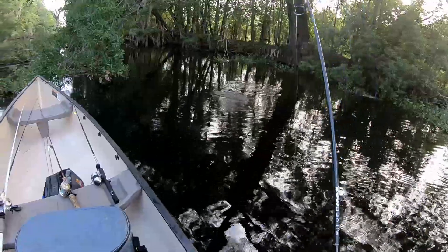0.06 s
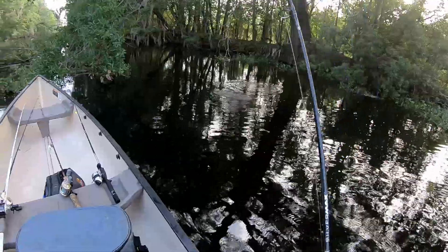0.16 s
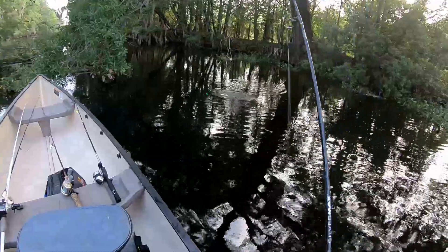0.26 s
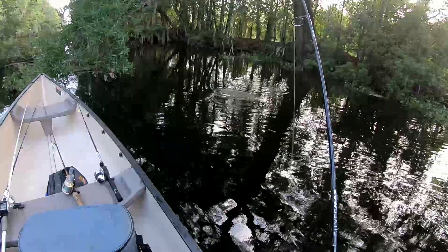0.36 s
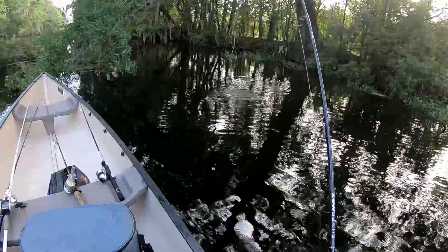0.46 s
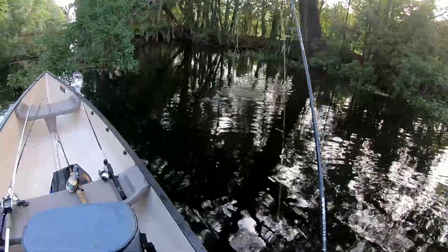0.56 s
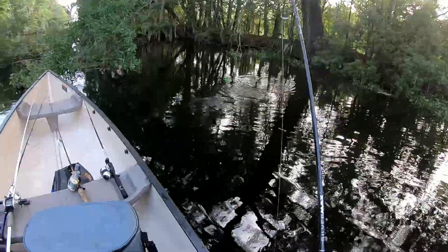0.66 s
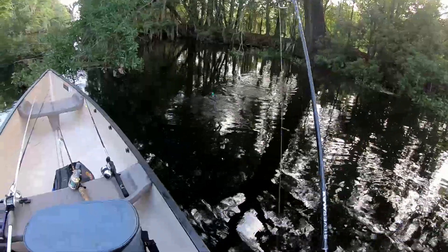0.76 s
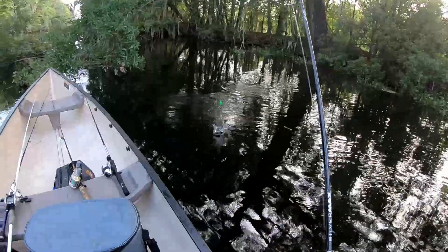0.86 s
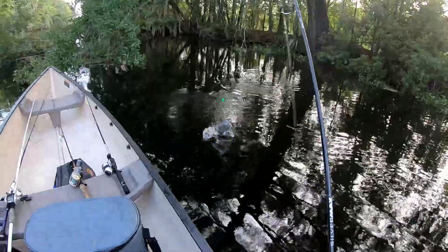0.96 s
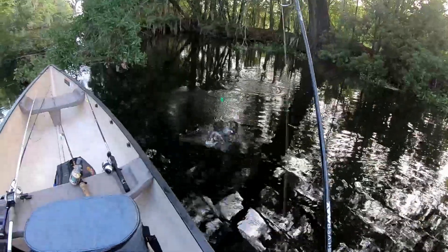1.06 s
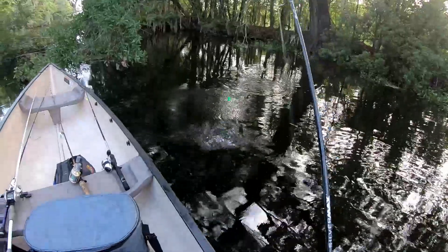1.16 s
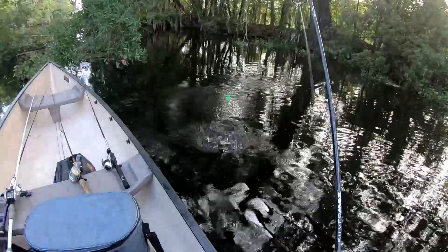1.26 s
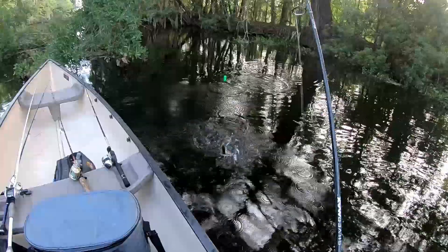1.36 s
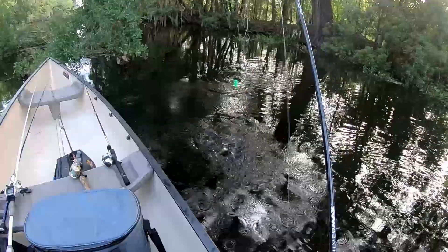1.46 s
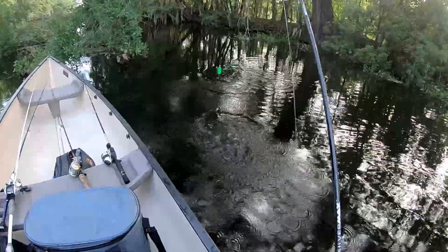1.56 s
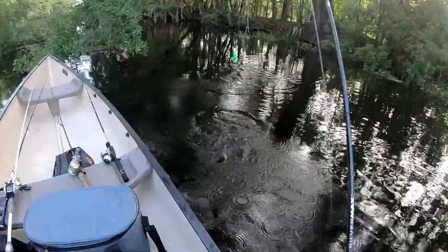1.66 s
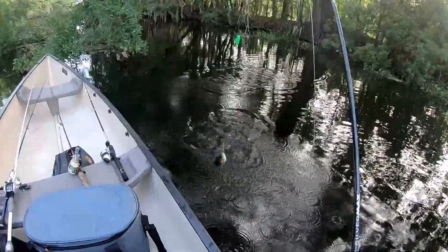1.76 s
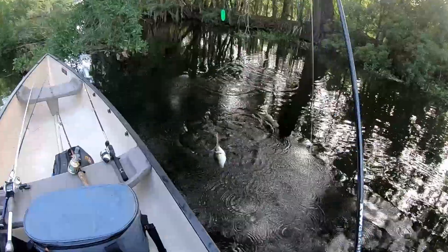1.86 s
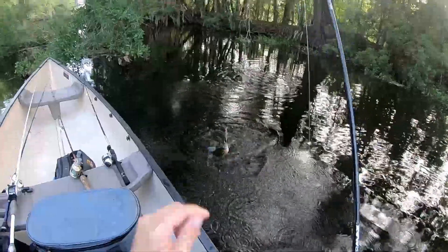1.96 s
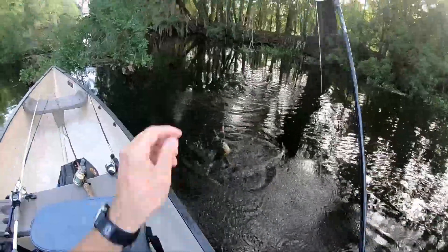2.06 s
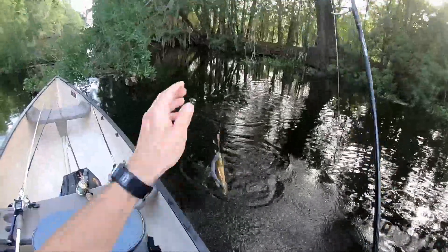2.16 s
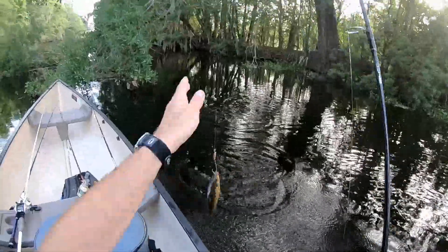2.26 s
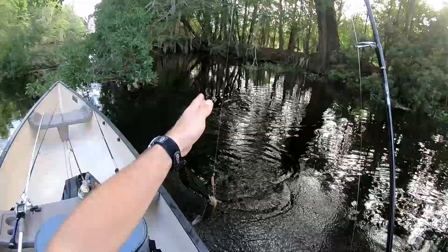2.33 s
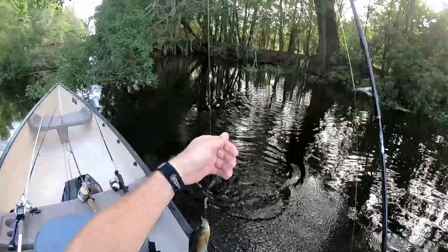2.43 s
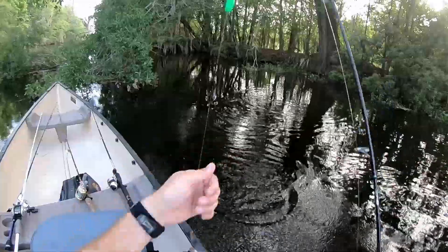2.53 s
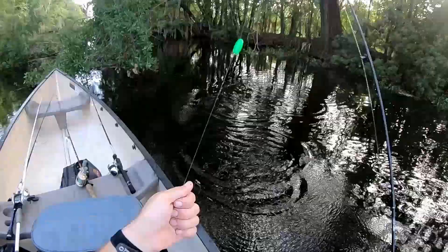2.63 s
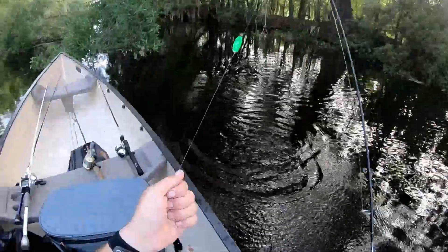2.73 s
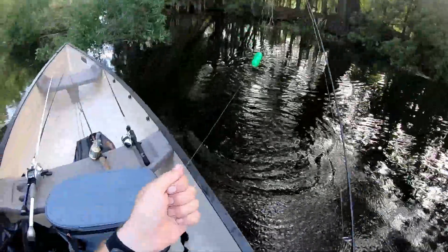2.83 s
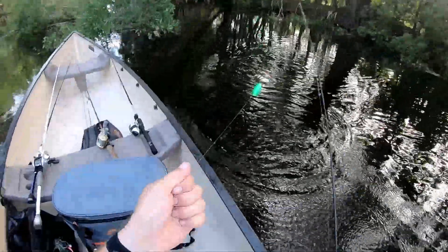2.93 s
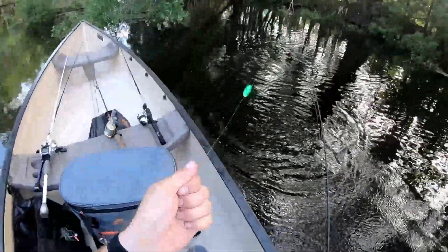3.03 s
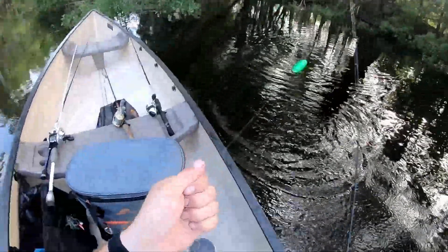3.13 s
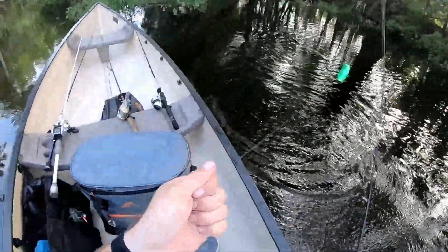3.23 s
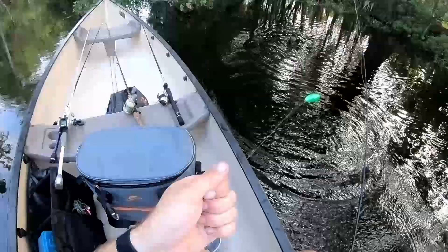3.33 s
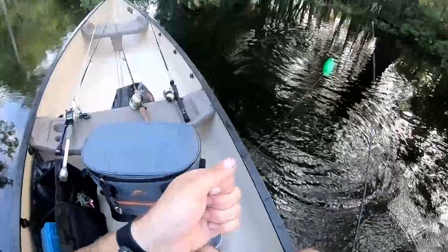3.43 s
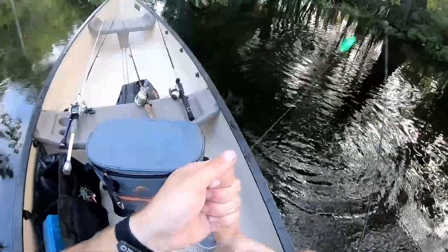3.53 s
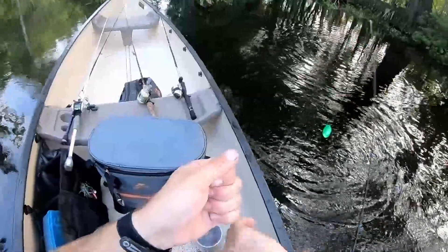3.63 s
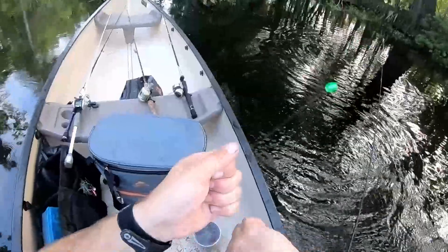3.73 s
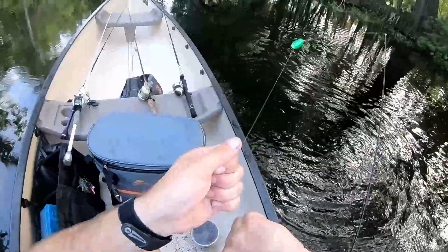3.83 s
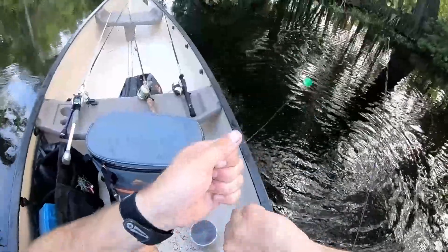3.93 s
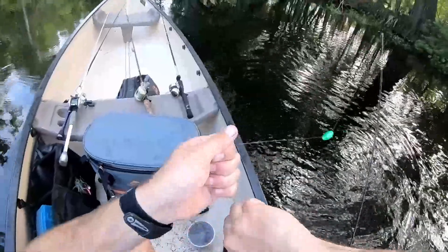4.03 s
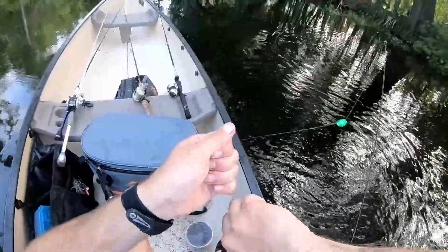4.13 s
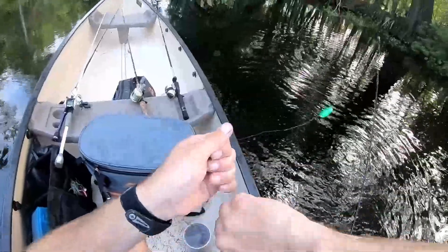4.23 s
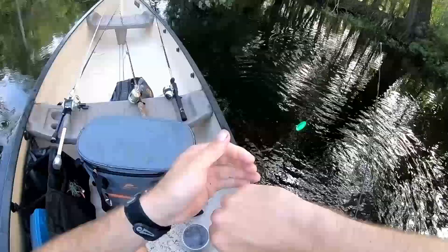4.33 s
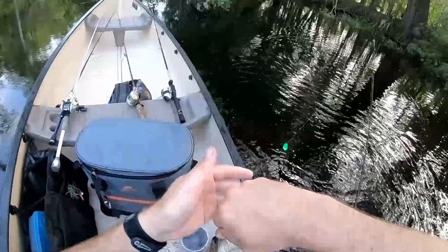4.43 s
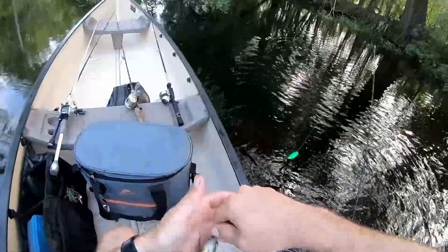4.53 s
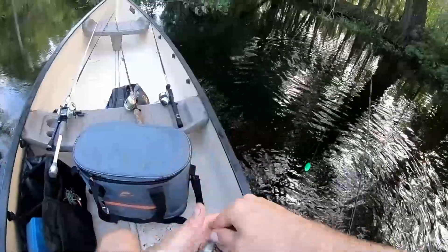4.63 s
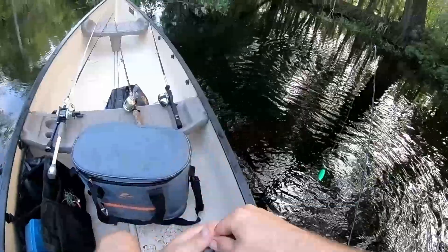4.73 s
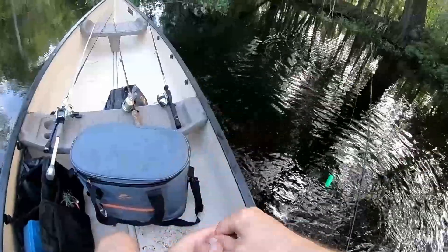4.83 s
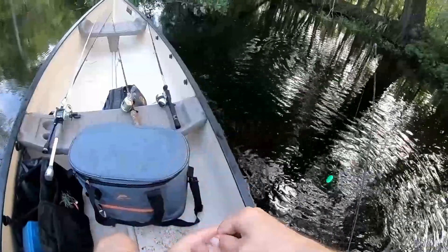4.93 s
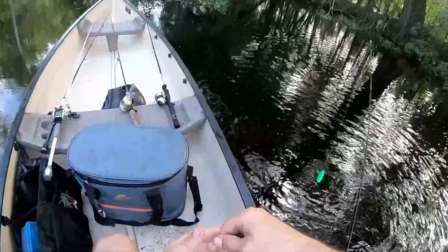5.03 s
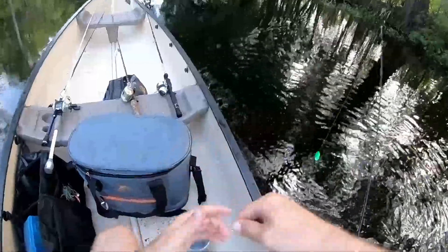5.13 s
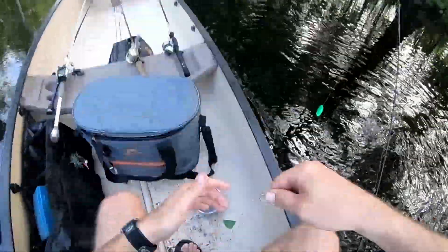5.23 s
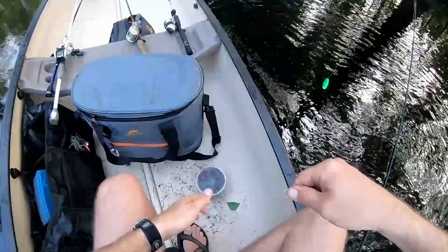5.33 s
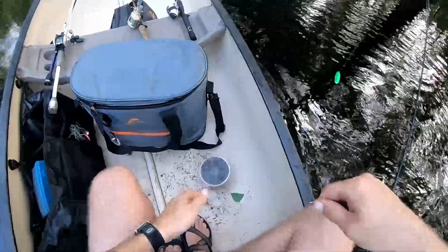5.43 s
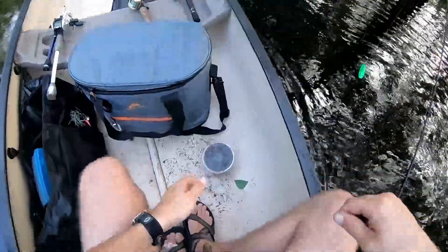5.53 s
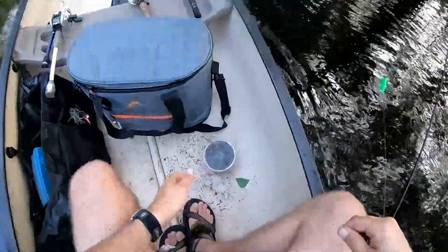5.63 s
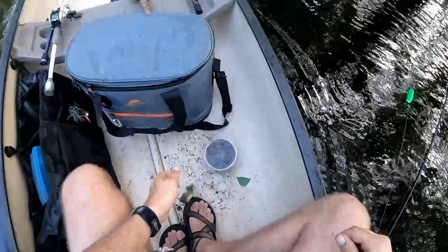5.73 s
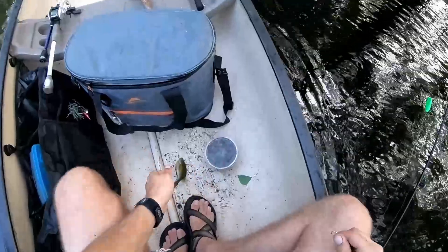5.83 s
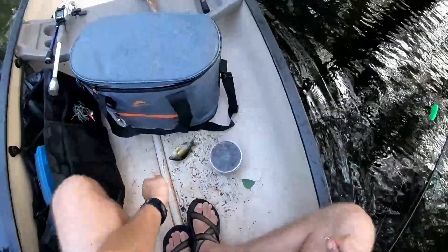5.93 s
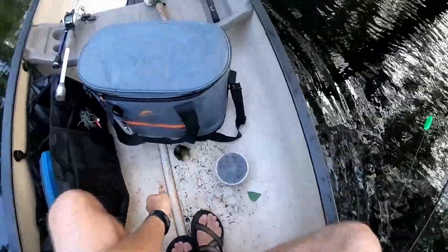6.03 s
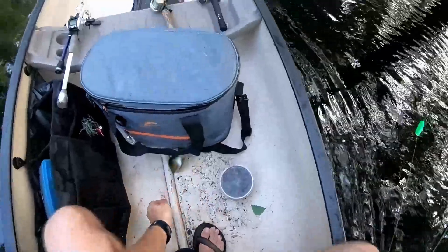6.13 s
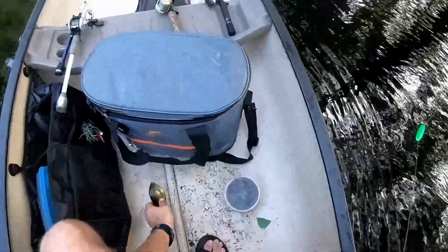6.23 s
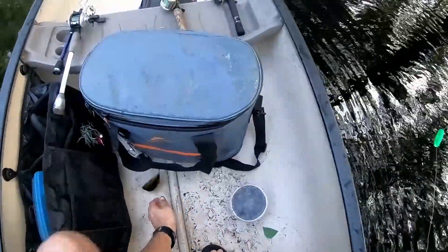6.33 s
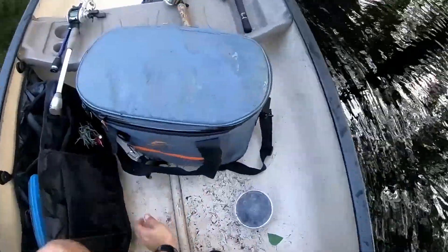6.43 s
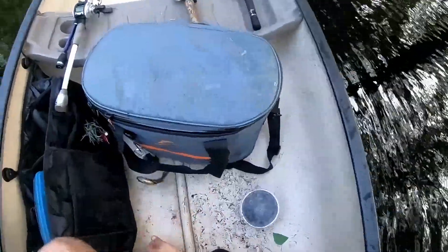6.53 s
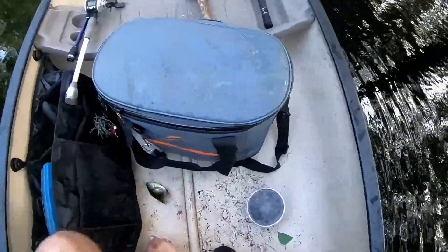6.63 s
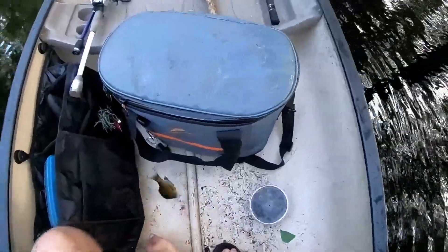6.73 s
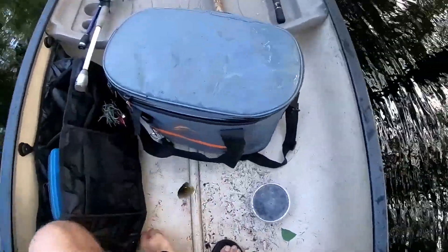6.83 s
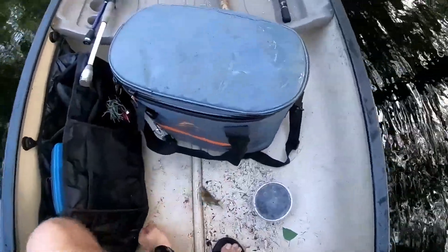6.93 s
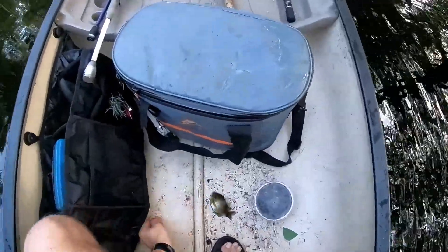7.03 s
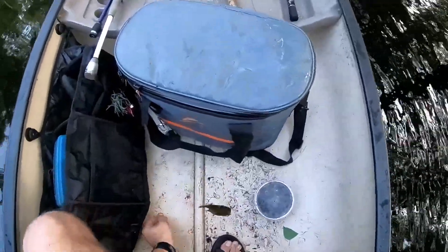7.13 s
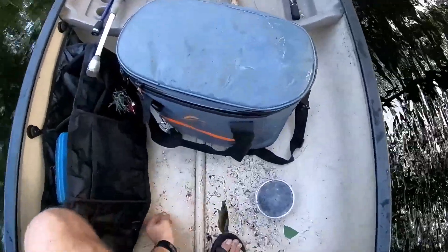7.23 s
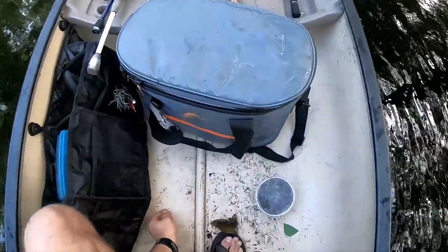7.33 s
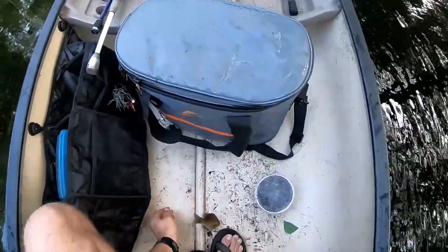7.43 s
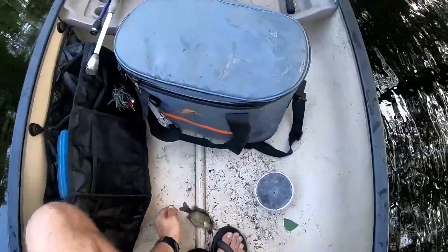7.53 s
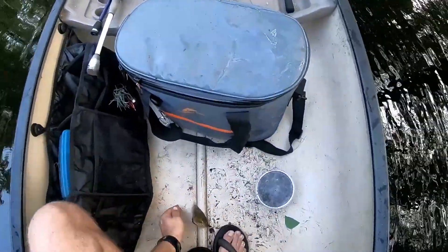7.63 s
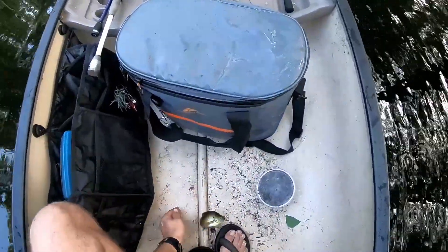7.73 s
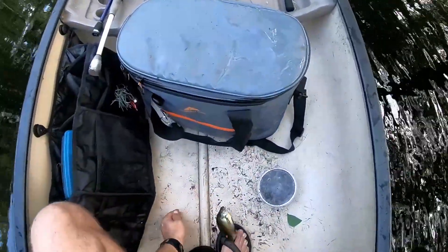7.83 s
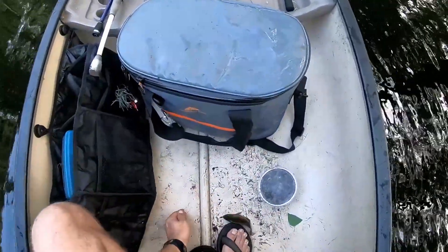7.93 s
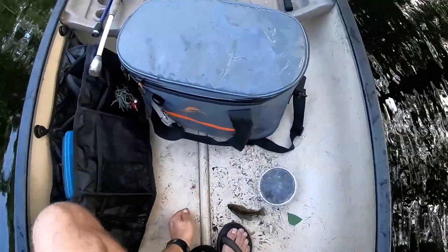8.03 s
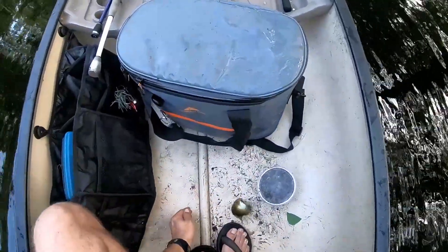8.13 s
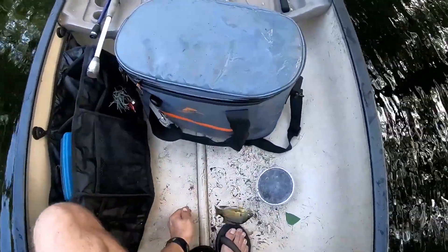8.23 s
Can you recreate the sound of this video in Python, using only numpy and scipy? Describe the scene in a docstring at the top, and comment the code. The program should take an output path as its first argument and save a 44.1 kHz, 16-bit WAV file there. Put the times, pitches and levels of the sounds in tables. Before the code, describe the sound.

A quiet open swamp: soft wide air, a thin steady insect chorus, and a high throbbing cicada on the right that swells until about 2.3 s, drops suddenly and continues very faintly. Two tiny high flicks come near 0.1-0.2 s, a single bubble or two near 0.6 and 0.9 s, then a short splash of plopping bubbles and fine spray from 1.0 to 1.5 s. A barely audible falling bird whistle passes around 2.3 s, with a deep body bump at 2.45 s. From 3.1 to 3.7 s a rod clatters on the hull, hollow and rattling, with scraping friction; lighter taps follow to 4.1 s. Sparse ticks lead to a knock and heavy low jolt at 5.3 s. From 5.7 s the fish flops, sharp gritty ticks and dull thuds, hardest around 6.3-6.8 s with strong rumble, then scattered softer flops until 8.25 s. Close, worn microphones.

```python
"""Fish landed in a still swamp

On a small boat, a chest camera with two microphone ports hears a hooked fish splash (bubble tones), a rod laid
down and rattling on the hull (ringing modes under ticks), then the fish flopping on the gritty floor (ticks and
thuds). The wearer's moves rumble close up (low swings and noise). Far off, shaped noise makes air, insects and
a cicada on the right; a gliding sine is one bird whistle."""
import sys
import numpy as np
from scipy.fft import rfft, irfft, next_fast_len
from scipy.io import wavfile
from scipy.ndimage import uniform_filter1d, map_coordinates

SR = 44100
rng = np.random.default_rng(int(sys.argv[2]) if len(sys.argv) > 2 else 0)


def generate_wav(sig):
    """Save sig (samples, or channels by samples) to the path in sys.argv[1] as 16-bit PCM at SR."""
    pcm = np.round(np.clip(np.atleast_2d(sig).T, -1, 1) * 32767).astype(np.int16)
    wavfile.write(sys.argv[1], SR, pcm)


N = 364707

# Far air over the swamp, part shared by both ports: (frequency [Hz], relative density [dB])
AIR_SHARED = [(140, -38), (230, -3), (450, -12.5), (520, -15), (900, -15), (1400, -18), (1800, -23.5),
              (3000, -25), (4600, -31), (6100, -21), (7500, -26.5), (11300, -27), (13500, -30),
              (15800, -61)]
# Far air, part opposed between the ports: (frequency [Hz], relative density [dB])
AIR_OPPOSED = [(140, -51), (230, 5.5), (501, -5.5), (689, -2), (753, -1.5), (1300, -8.5), (1470, -11.5),
               (2380, -19), (4260, -76), (5970, -32), (7250, -23.5), (12100, -25.5), (15800, -68)]
AIR_SHARED_DB, AIR_OPPOSED_DB = -66, -59.5  # rms

# Far insect chorus: (frequency [Hz], relative density [dB])
CHORUS_SPECTRUM = [(5400, -13.5), (5750, 4), (6000, 6.5), (6250, 6.5), (6600, -17.5)]
# Cicada buzz colour: (frequency [Hz], relative density [dB])
CICADA_SPECTRUM = [(3820, -34), (6500, -8), (6810, -5.5), (7300, -4), (8600, -5.5), (9320, -1),
                   (10800, -0.5), (12600, -5.5), (15500, -21)]
# Cicada loudness: (time [s], level [dB])
CICADA_LEVEL = [(0.0, -66.5), (0.5, -64.5), (0.99, -63.5), (1.38, -61), (2.14, -60.5), (2.3, -62.5),
                (2.42, -79), (2.69, -77.5), (3.48, -69.5), (4.35, -73.5), (6.49, -71), (8.27, -72.5)]
# Far bird whistle: (time [s], level [dB], pitch [Hz])
BIRD_WHISTLE = [(2.2, -105, 4453), (2.25, -84, 4312), (2.44, -82, 4267), (2.469, -105, 4276)]

# Upper hull murmur: (frequency [Hz], relative density [dB])
MURMUR_SPECTRUM = [(70, -64), (110, -10), (155, -0.5), (215, -6.5), (270, -19), (340, -22.5), (500, -59),
                   (900, -120)]
# Lower hull slosh: (frequency [Hz], relative density [dB])
SLOSH_SPECTRUM = [(35, -63), (58, -2), (85, -6.5), (110, -5), (160, -50), (300, -120)]
# Low bumps through the hull: (centre time [s], length [s], murmur level [dB], slosh level [dB])
HULL_BUMPS = [(0.09, 0.095, -54.5, -45.5), (0.67, 0.087, -64, -50), (1.02, 0.049, -41, -42.5),
              (1.5, 0.089, -80, -55), (1.68, .08, -49.5, -44.5), (2.165, 0.035, -60, -43),
              (2.39, 0.096, -52.5, -52), (2.51, 0.063, -69, -47), (2.65, 0.07, -60, -59),
              (3.14, 0.049, -51, -55), (3.3, 0.042, -35, -29.5), (3.45, 0.087, -34.5, -46),
              (3.61, 0.073, -49.5, -43), (3.82, 0.035, -80, -54), (4.6, 0.09, -64, -54),
              (5.33, 0.068, -38, -36.5), (5.44, 0.072, -54.5, -43.5), (5.94, 0.11, -50, -62),
              (6.1, 0.11, -52, -44.5), (6.51, 0.16, -46, -45), (6.82, .12, -40, -43.5),
              (7.1, 0.082, -55, -45.5), (7.52, .1, -49, -74), (7.66, 0.083, -57, -59),
              (8.06, .12, -49, -49)]
MURMUR_DB, SLOSH_DB = -56, -61.5  # the hull at rest

# Rumble of the worn camera: (frequency [Hz], relative density [dB])
RUMBLE_SPECTRUM = [(10, -30), (20, -4), (30, 0), (42, -3), (55, -14), (75, -30), (120, -70), (250, -140)]
# Steady fidgeting of the wearer: (time [s], level [dB])
SWAY_LEVEL = [(0.0, -44), (1.6, -52), (2.3, -40.5), (3.0, -43.5), (3.5, -42), (4.8, -46), (5.5, -42),
              (6.7, -35), (7.4, -43.5), (8.27, -50)]
# Jolts of the body: (centre time [s], length [s], level [dB], swing rate [Hz])
BODY_JOLTS = [(0.11, 0.051, -46, 33.84), (0.287, 0.1, -41, 29.77), (0.421, 0.098, -38.5, 33.96),
              (0.685, .07, -41, 36.2), (1.023, 0.059, -40.5, 50.17), (1.363, 0.059, -42, 38.92),
              (1.484, 0.042, -41.5, 32.18), (1.785, .07, -40, 32.24), (2.042, 0.19, -37.5, 30.92),
              (2.303, 0.12, -46, 26.72), (2.449, 0.097, -22.5, 32.1), (2.663, 0.067, -25.5, 38.06),
              (2.86, 0.031, -39, 29.4), (3.052, 0.035, -37.5, 36.15), (3.344, 0.065, -30, 50),
              (3.454, .05, -37, 27.62), (3.592, .07, -31.5, 36), (3.782, 0.051, -39, 31.96),
              (4.153, 0.11, -41.5, 38.46), (4.576, 0.09, -43, 39.86), (4.9, 0.083, -44.5, 31.1),
              (5.28, .07, -18.5, 28.95), (5.34, .05, -21.5, 26), (5.42, 0.067, -29, 32.22),
              (5.559, 0.069, -29, 20.8), (5.633, 0.034, -34.5, 22.97), (5.813, 0.043, -35, 23.07),
              (6.122, 0.065, -29.5, 32.03), (6.303, 0.059, -43, 28.97), (6.439, 0.043, -26, 30.87),
              (6.537, .08, -18, 25.4), (6.617, 0.063, -20.5, 24), (6.733, 0.052, -32, 23.9),
              (6.931, 0.064, -32.5, 21.18), (7.112, 0.043, -39, 35.4), (7.26, 0.058, -37.5, 29.07),
              (7.484, 0.044, -37, 29.8), (7.79, 0.061, -41, 33.04), (8.037, 0.067, -37.5, 30.3),
              (8.143, 0.063, -38.5, 23.8)]

# Camera case resonances: (frequency [Hz], width [Hz], level [dB])
CASE_MODES = [(1481.5, 570, 5), (2295, 360, 2), (3090, 550, 0.5), (3697, 420, 5.5), (4190, 1580, -3)]
# Cavity resonances of the microphone port: (frequency [Hz], width [Hz], level [dB])
PORT_MODES = [(5110, 512, 0), (7210, 1570, 12), (7170, 260, 12), (8830, 850, -7.5), (11300, 4800, -17)]
# Left port over right for near sound: (frequency [Hz], level [dB])
LEFT_OVER_RIGHT = [(60, 13.5), (170, -4.5), (270, -1.5), (420, -12.5), (900, -4), (1400, -7.5), (3300, 0),
                   (6000, -5), (8000, -10.5), (13000, -8)]
# Phase by which the left port leads, negative when it lags: (frequency [Hz], phase [rad])
LEFT_LEAD = [(0, 0.5), (520, -2), (780, -2), (2240, -4), (3360, -6), (3700, -1.5), (4220, -12),
             (5860, -6.5), (6290, -15), (6630, -14.5), (8960, -27), (11500, 3), (13500, -39), (16200, -62)]
TOP_HZ = 15800  # band limit of the camera

# Cloth, grit and ripples nearby: (time [s], level [dB])
RUSTLE_LEVEL = [(0.0, -68), (0.92, -66), (1.13, -58), (1.33, -54), (1.5, -63), (1.89, -71), (3.18, -71.5),
                (3.31, -56), (3.64, -69.5), (4.17, -84), (4.74, -72.5), (5.27, -62), (5.5, -76.5),
                (6.55, -63.5), (6.84, -88), (7.49, -91), (7.67, -76), (8.27, -76)]
# Thin high flicks, perhaps the line in the rod guides: (time [s], peak level [dB])
LINE_FLICKS = [(0.1002, -47), (0.19, -46)]
# Hiss colour of a flick: (frequency [Hz], relative density [dB])
FLICK_SPECTRUM = [(7000, -60), (9500, -6), (11500, 0), (14500, -7), (16000, -40)]

# Hull modes, floor boom in the first two rows: (frequency [Hz], level [dB], base 60 dB decay [s])
HULL_MODES = [(225, -2.5, 0.06), (319, -1, 0.054), (402.7, -5, 0.11), (490.6, -2.5, 0.093),
              (539.5, 1, 0.063), (601, -0.5, 0.041), (732, -1.5, 0.069), (886, -6, 0.072)]
# Rod modes: (frequency [Hz], level [dB], base 60 dB decay [s])
ROD_MODES = [(942, 2.5, 0.035), (1065, -12.5, 0.1), (1246, 4, 0.033), (1420, 0, 0.033), (1557, -14, 0.19),
             (1640, -3, 0.072), (1940, -2.5, 0.094), (2135, 3, 0.055)]
# Gear and fish sliding on the hull: (time [s], level [dB])
RUB_LEVEL = [(3.0, -89), (3.112, -56), (3.26, -52), (3.28, -28), (3.332, -26), (3.422, -43.5), (3.484, -35),
             (3.682, -59.5), (4.056, -55.5), (4.25, -66.5), (5.01, -85), (5.182, -55), (5.3, -50),
             (5.32, -37.5), (5.4, -57), (5.51, -71.5), (6.25, -84), (6.54, -49.5), (6.82, -74), (8.27, -66)]

# Rod and gear on the hull: (time [s], tick level [dB], floor boom over tick [dB], hull ring over tick [dB],
# struck spot [Hz], rod ring over tick [dB], port brightness over case [dB])
KNOCK_EVENTS = [(3.0896, -66.5, 13, 29.5, 675, 21, 4), (3.1242, -27, 2.5, 14.5, 596, 10, -7.5),
                (3.1476, -43, 10, 17, 395, 18.5, -13), (3.169, -55.5, 7, 26, 394, 18, -6),
                (3.189, -52.5, 16, 19.5, 380, 13, -8), (3.273, -24.5, -12, 10.5, 606, 10.5, -2),
                (3.279, -23.5, 2, 14.5, 563, 7, -12), (3.2859, -26.5, -2, 6.5, 393, 4, -21),
                (3.3125, -32, 3, 16, 730, 1, -10.5), (3.3321, -34.5, 4, 19, 509, 5, -9),
                (3.3538, -46.5, 4, 28.5, 378, 12, 1), (3.396, -46.5, 0, 31.5, 735, 13, 1),
                (3.4239, -24, -13, 13, 560, 1, -9.5), (3.4941, -30.5, -1, 14.5, 544, 5, -10),
                (3.551, -49, 2, 25, 520, 16, -7), (3.6013, -35.5, -10, -4, 355, -1.5, -10),
                (3.6295, -45, 0, 0, 353, 4.5, -16), (3.6517, -45.5, -16, -12, 400, -7, -11),
                (3.68, -36, -2.5, -5.5, 354, -0.5, -8), (3.8374, -46.5, -18, 13, 553, -14, -18),
                (3.906, -40, -6, 9.5, 497, 9.5, -22), (4.095, -49, -5, 20, 451, 12.5, -15),
                (4.9753, -55.5, 9.5, 7.5, 374, 7, -7), (5.1558, -49, 2, 8, 441.3, 13.5, -5),
                (5.1878, -42.5, -5, 7.5, 393, 8, -1), (5.3173, -22.5, 1, 16, 536, 3, 1.5),
                (5.3337, -46, 12, 21, 504.8, 0, -14), (6.5236, -32.5, 3, 6.5, 360, 9, 0)]
HULL_RING, ROD_RING = 1.22, 0.83  # factors on the base decay times
ROD_SPOT_HZ = 970  # where the rod is struck
KNOCK_TICK_T60 = 0.076  # base 60 dB decay of the crackle, s
SETTLED_S = 4.0  # the rod has come to rest
SETTLED_RING = 0.54  # decay time factor afterwards: gear lying on the hull damps it

# Fish slaps and tackle ticks: (time [s], tick level [dB], tick colour [Hz], port brightness over case [dB],
# thud over tick [dB])
SLAP_EVENTS = [(1.0082, -71, 1600, 0, 17), (1.081, -43.5, 1506, 1.5, -20), (1.217, -44, 2230, 3, -31),
               (1.2535, -39, 3100, 2, -29), (1.4018, -38.5, 3140, 3, -17), (2.6712, -48, 3300, -9, -6),
               (2.684, -48.5, 3300, -11, -8), (2.8847, -51, 2129, -14, 2.5), (4.54, -43, 4110, -1, -13),
               (4.5773, -62, 1408, 17, 1.5), (4.74, -49, 3323, 0, -13), (4.883, -45, 3260, -12, -21),
               (4.8955, -36, 3064, -11, -36), (4.907, -49, 1567, 8, -19), (4.995, -41.5, 1574, -14, -23),
               (5.244, -38, 3600, -6, -23), (5.6853, -62.5, 1463, 13, 13), (5.7325, -39, 3518, 1, -7.5),
               (5.9242, -41, 3696, 3.5, -0.5), (5.9395, -46.5, 1430, 2.5, 9), (6.0603, -52, 1410, 5, 5),
               (6.1869, -34.5, 3646, -3.5, -3.5), (6.2256, -45.5, 3070, -11, 4),
               (6.2979, -43.5, 1515, -2.5, -9), (6.3338, -27, 3014, 4, -18.5),
               (6.4433, -40.5, 1398, 3, -0.5), (6.4534, -43.5, 1592, 8, -7),
               (6.4786, -21.5, 3395, 12.5, -11.5), (6.4924, -35, 1432, -16, 9), (6.57, -43, 1840, 2, 1),
               (6.7242, -32.5, 3064, -17, 6.5), (6.7611, -25.5, 3260, -3, -3), (6.7794, -46, 2986, 1, 7.5),
               (7.0364, -35.5, 1411, -7, -2.5), (7.0838, -51, 3680, 4, 14), (7.1093, -36, 3225, 6, -3),
               (7.1281, -43, 2040, -2.5, -2), (7.4538, -47, 1470, 3, -15), (7.4891, -31, 3420, -13, -9),
               (7.6247, -43.5, 3353, 1, 8), (7.64, -45.5, 3070, 1, 5), (7.695, -51, 3240, 5, -15),
               (7.7332, -51, 3425, 8, -19), (7.789, -44, 2920, -9, -17), (7.8061, -38.5, 3060, -9, -26),
               (7.8242, -44.5, 3264, 1.5, -24), (8.0268, -39.5, 3230, -6, -10),
               (8.0972, -40.5, 3310, -2, -10), (8.1062, -49, 3830, 6, -10), (8.226, -46.5, 2840, -3, -8),
               (8.2447, -49.5, 3250, -1.5, -11)]
# Dull landing of the soft body: (frequency [Hz], relative density [dB])
THUD_SPECTRUM = [(53, -48), (90, -16.5), (231, -4), (397, -6.5), (485, -6.5), (571, -9), (1500, -28),
                 (1950, -61), (3300, -120)]
SLAP_T60, THUD_T60 = 0.031, 0.17  # 60 dB decay of the hardest slap's crackle and of the thud, s
SOFT_SLAP_LONGER = 1.58  # crackle decay factor for each 10 dB softer

# Bubbles from the thrashing fish: (time [s], peak level [dB], pitch [Hz])
BUBBLES = [(0.576, -38.5, 1680), (0.611, -49, 3080), (0.915, -46.5, 2990), (1.093, -31, 1520),
           (1.104, -37.5, 3300), (1.166, -46, 2900), (1.179, -38.5, 1760), (1.232, -43, 1010),
           (1.2321, -40.5, 3270), (1.233, -34, 1720), (1.252, -40, 3030), (1.264, -37, 866),
           (1.299, -31.5, 1980), (1.3, -38, 1080), (1.3069, -49, 3240), (1.308, -42, 2030),
           (1.311, -47, 780), (1.339, -50, 923), (1.416, -36.5, 2294), (1.4194, -40, 3500),
           (1.503, -52, 3200), (1.6427, -52, 3100)]
# Dense spray: (time [s], level [dB])
SPRAY_LEVEL = [(1.04, -86), (1.124, -87), (1.266, -60.5), (1.386, -72), (1.418, -84), (1.5, -73)]
# Loudness of spray bubbles by pitch: (frequency [Hz], relative level [dB])
SPRAY_SPECTRUM = [(290, -54), (500, -14), (938, 5), (1360, -11), (2130, 4), (2690, -9), (3180, -7),
                  (4630, -9), (9000, -13), (11700, -46), (19800, -120)]


def amp(db):
    """dB to gain."""
    return 10 ** (np.asarray(db) / 20)


def unit(x):
    """Scaled to rms 1."""
    return x / np.sqrt(np.mean(x ** 2) + 1e-20)


def peak(x):
    """Scaled to peak 1."""
    return x / (np.abs(x).max() + 1e-20)


def along(points, hz):
    """Values of (Hz, value) points read on a log frequency axis."""
    f, v = np.transpose(points)
    return np.interp(np.log(hz + 1), np.log(f + 1), v)


def level(rows, order=1):
    """Gain per sample from a dB column of (s, ..) rows, silent outside them."""
    cols = np.transpose(rows)
    return amp(np.interp(np.arange(N) / SR, cols[0], cols[order], left=-120, right=-120))


def swells(rows, order):
    """Gain per sample: each (centre s, length s, ..) row swells to its dB column and fades."""
    t = np.arange(0, N + 64, 64) / SR
    cols = np.transpose(rows)[:, :, None]
    bells = np.exp(-(2 * (t - cols[0]) / cols[1]) ** 2)
    gain = (amp(cols[order]) * bells).sum(axis=0)
    return np.interp(np.arange(N) / SR, t, gain)


def wobble(rate):
    """A smooth random curve, rate knots a second."""
    knots = rng.standard_normal(int(N * rate / SR) + 4)
    return map_coordinates(knots, [np.arange(N) * rate / SR])


def filtered(x, response):
    """x times a complex response of frequency."""
    n = x.shape[-1]
    m = next_fast_len(n + 4096)
    return irfft(rfft(x, m) * response(np.fft.rfftfreq(m, 1 / SR)), m)[..., :n]


def coloured(n, spectrum):
    """n samples of noise shaped by a dB spectrum."""
    return filtered(rng.standard_normal(n), lambda hz: amp(along(spectrum, hz)))


def noise(spectrum):
    """Coloured noise of rms 1."""
    return unit(coloured(N, spectrum))


def pair(spectrum, alike, left_db):
    """Stereo noise with correlation alike between the sides, the left louder by left_db."""
    turn = np.arccos(np.clip(alike, -1, 1)) / 2
    mid, side = np.cos(turn) * noise(spectrum), np.sin(turn) * noise(spectrum)
    return np.array([mid + side, mid - side]) * amp([[left_db / 2], [-left_db / 2]])


def resonances(modes):
    """Causal response of (Hz, width Hz, dB) modes, summed with alternating signs."""
    def response(f):
        total = 0
        for k, (centre, width, db) in enumerate(modes):
            damping = 1j * f * width
            total = total + (-1) ** k * amp(db) * damping / (centre ** 2 - f ** 2 + damping)
        return total
    return response


def add(track, s, sound):
    """Mixes a sound in at s seconds."""
    part = track[..., round(s * SR):][..., :sound.shape[-1]]
    part += sound[..., :part.shape[-1]]


def far_air():
    """Wide, steady noise of the open swamp, leaning to a side by frequency."""
    mid, side = amp(AIR_SHARED_DB) * noise(AIR_SHARED), amp(AIR_OPPOSED_DB) * noise(AIR_OPPOSED)
    left_lean = [(300, -0.93), (5000, 1), (9000, -0.42)]  # (Hz, dB), opposite on the right
    return filtered(np.array([mid + side, mid - side]), lambda hz: amp(along(left_lean, hz) * [[1], [-1]]))


def insect_chorus():
    """Many far insects blend into a narrow band of nearly steady noise."""
    return amp(-65.5 + 0.33 * wobble(21)) * pair(CHORUS_SPECTRUM, alike=-0.33, left_db=-3.5)


def cicada():
    """A high buzz on the right throbs about 35 times a second; it drops suddenly, then goes on faintly."""
    phase = 2 * np.pi * 35.0 * np.arange(N) / SR + 0.4 * wobble(3.9)
    throb = 1 + 0.2 * np.sin(phase)
    return level(CICADA_LEVEL) * throb * pair(CICADA_SPECTRUM, alike=0.065, left_db=-10.5)


def bird():
    """One thin falling whistle: a sine of gliding pitch."""
    s, _, hz = np.transpose(BIRD_WHISTLE)
    pitch = np.interp(np.arange(N) / SR, s, hz)
    return np.sqrt(2) * level(BIRD_WHISTLE) * np.sin(2 * np.pi * np.cumsum(pitch) / SR)


def hull_murmur():
    """The hull murmurs and sloshes in two low noise bands, swelling at each bump."""
    upper = amp(MURMUR_DB + 0.81 * wobble(13)) + swells(HULL_BUMPS, order=2)
    lower = amp(SLOSH_DB + 4.5 * wobble(13)) + swells(HULL_BUMPS, order=3)
    murmur = upper * pair(MURMUR_SPECTRUM, alike=0.053, left_db=-1.0)
    return murmur + lower * pair(SLOSH_SPECTRUM, alike=0.22, left_db=4.5)


def wearer():
    """Body moves swing the camera on its strap: a wavering low tone at each jolt, over rumble."""
    s, _, _, hz = np.transpose(BODY_JOLTS)
    rate = np.interp(np.arange(N) / SR, s, hz) * (1 + 0.21 * wobble(14))
    swing = np.sqrt(2) * np.sin(2 * np.pi * np.cumsum(rate) / SR) * amp([[1.7], [-1.7]])  # left louder
    sway = level(SWAY_LEVEL) * amp(1.5 * wobble(21))
    jolts = swells(BODY_JOLTS, order=2)
    return jolts * swing + (sway + 0.29 * jolts) * pair(RUMBLE_SPECTRUM, alike=0.69, left_db=2.5)


def rustle():
    """A faint uneven crackle coloured by the camera case."""
    grit = amp(2.3 * wobble(30) + 1.1 * wobble(320)) * rng.standard_normal((3, N))
    grit = grit[0] + 2.0 * grit[1:]  # a shared part, and one for each port
    return level(RUSTLE_LEVEL) * unit(filtered(grit, resonances(CASE_MODES)))


def flicks():
    """Brief puffs of very high hiss."""
    out, t = np.zeros(N), np.arange(SR // 10) / SR
    shape = amp(-60 * t / 0.06) * (1 - np.exp(-t / 0.004))
    for s, db in LINE_FLICKS:
        add(out, s, amp(db) * peak(coloured(len(t), FLICK_SPECTRUM) * shape))
    return out


def rub():
    """Soft, uneven friction keeps the hull and rod modes humming."""
    # widths are about four times those of freely ringing modes
    modes = [(hz, 9 / t60, db) for hz, db, t60 in HULL_MODES]
    modes += [(hz, 9 / t60, db - 19.5) for hz, db, t60 in ROD_MODES]
    wall = resonances(modes)
    drag = amp(3 * wobble(45)) * rng.standard_normal((3, N))
    drag = drag[0] + 0.73 * drag[1:]  # a shared part, and one for each port
    hum = filtered(drag, lambda hz: wall(hz) / (1 + 1j * hz / 1500) ** 2)  # soft contact dulls the top
    return level(RUB_LEVEL) * unit(hum)


def tick(t, t60, bright_db, spot_hz, apart):
    """A hard contact: a dying crackle and a faint echo from the banks, partly different at each port."""
    crackle = amp(-60 * t / t60) * (1 - np.exp(-t / 0.00026))
    first_crack = 2.8 * amp(-60 * t / 0.007) * (1 - np.exp(-t / 0.00053))
    echo = 0.044 * amp(-60 * t / 0.4)
    burst = rng.standard_normal((3, len(t))) * (crackle + first_crack + echo)
    burst = burst[0] + apart * burst[1:]
    # case modes near the struck colour answer most
    case = [(hz, width, db - 7 * np.log2(hz / spot_hz) ** 2) for hz, width, db in CASE_MODES]
    body = peak(filtered(burst, resonances(case)))
    return body + amp(bright_db) * peak(filtered(burst, resonances(PORT_MODES)))


def ring(t, modes, spot_hz, long, focus_db):
    """A blow rings the modes nearest the struck spot most; long scales their decay times."""
    hz, db, t60 = np.transpose(modes)[:, :, None]
    draw = rng.standard_normal((len(hz), 2))
    near_db = -focus_db * np.log2(hz / spot_hz) ** 2
    fade_db = -60 * t / (t60 * long)
    gain = amp(db + near_db + 3 * draw[:, :1] + fade_db)
    hz = hz * (1 + 0.008 * draw[:, 1:])  # each blow is slightly detuned
    partials = gain * np.sin(2 * np.pi * hz * t)
    return peak(partials.sum(axis=0) * (1 - np.exp(-t / 0.0014)))


def knocks():
    """Rod and gear strike the hull: floor, hull wall and rod ring under the tick of each contact."""
    out, t = np.zeros((2, N)), np.arange(SR // 4) / SR
    for s, db, boom_db, hull_db, hull_hz, rod_db, bright_db in KNOCK_EVENTS:
        damp = 1 if s < SETTLED_S else SETTLED_RING
        boom = amp(boom_db) * ring(t, HULL_MODES[:2], 184, damp * HULL_RING, focus_db=33)
        hull = amp(hull_db) * ring(t, HULL_MODES[2:], hull_hz, damp * HULL_RING, focus_db=28)
        rod = amp(rod_db) * ring(t, ROD_MODES, ROD_SPOT_HZ, damp * ROD_RING, focus_db=13)
        contact = tick(t, damp * KNOCK_TICK_T60, bright_db, spot_hz=2715, apart=0.98)
        add(out, s, amp(db) * (boom + hull + rod + contact))
    return out


def slaps():
    """A wet or gritty tick, shorter when hard, with the dull thud of the soft body landing."""
    out, t = np.zeros((2, N)), np.arange(SR // 3) / SR
    hardest_db = max(row[1] for row in SLAP_EVENTS)
    thud_shape = amp(-60 * t / THUD_T60) * (1 - np.exp(-t / 0.0043))
    for s, db, spot_hz, bright_db, thud_db in SLAP_EVENTS:
        thud = peak(coloured(len(t), THUD_SPECTRUM) * thud_shape)
        t60 = np.minimum(SLAP_T60 * SOFT_SLAP_LONGER ** ((hardest_db - db) / 10), 0.2)
        contact = tick(t, t60, bright_db, spot_hz, apart=0.79)
        add(out, s, amp(db) * (contact + amp(thud_db) * thud))
    return out


def bubble(t, hz, life):
    """A bubble's tone wavers in level and rises a little in pitch as it dies."""
    rough = 1 + 0.5 * uniform_filter1d(rng.standard_normal(len(t)), size=40) * np.sqrt(40)
    tone = np.sin(2 * np.pi * hz * t * (1 + 0.012 * t / life))
    return peak(rough * tone * np.exp(-t / life) * (1 - np.exp(-t / 0.0015)))


def splash():
    """The fish thrashes: single bubbles over a dense spray of small random ones."""
    out, spray, t = np.zeros(N), np.zeros(N), np.arange(SR // 20) / SR
    for s, db, hz in BUBBLES:
        add(out, s, amp(db) * bubble(t, hz, life=0.0017 + 4.5 / hz))
    start, end = SPRAY_LEVEL[0][0], SPRAY_LEVEL[-1][0]
    for when, pitch, size in rng.random((300, 3)):
        hz = 700 * 6 ** pitch  # 700 to 4200 Hz
        gain = amp(along(SPRAY_SPECTRUM, hz) - 2.5 * np.log(size))  # a few stand out
        add(spray, start + when * (end - start), gain * bubble(t[:900], hz, life=4.5 / hz))
    return out + level(SPRAY_LEVEL) * unit(spray)


def ports(x):
    """Near sound meets the left port with a level and phase of its own at each frequency."""
    f, lead = np.transpose(LEFT_LEAD)
    left = filtered(x[0], lambda hz: amp(along(LEFT_OVER_RIGHT, hz)) * np.exp(1j * np.interp(hz, f, lead)))
    return np.array([left, x[1]])


def scene():
    """Near sources pass the two ports; the rest is laid around them."""
    far = far_air() + insect_chorus() + cicada() + bird()
    worn = hull_murmur() + wearer()
    near = rustle() + flicks() + rub() + knocks() + slaps() + splash()
    return far + worn + ports(near)


def record(dry):
    """The camera keeps nothing above its band limit."""
    return filtered(dry, lambda hz: hz < TOP_HZ)


dry = scene()
out = record(dry)
generate_wav(out)
```